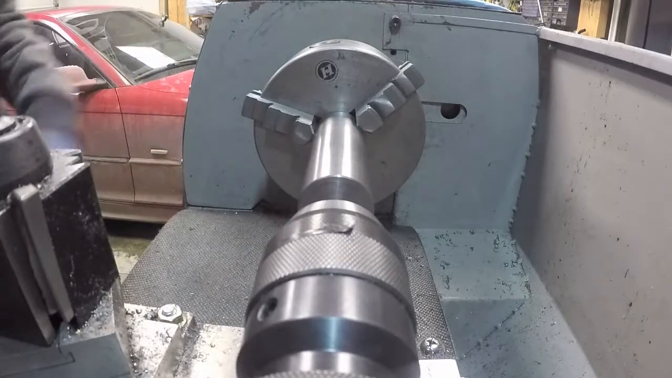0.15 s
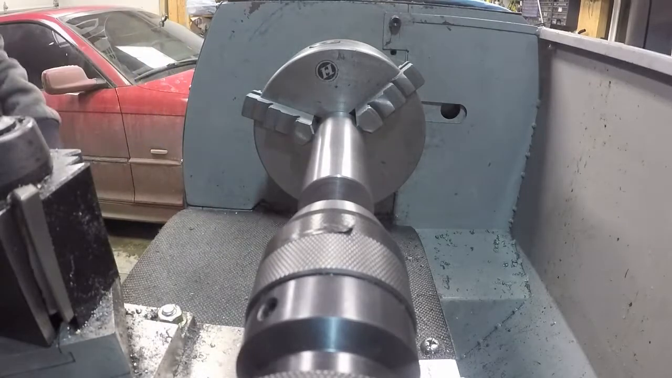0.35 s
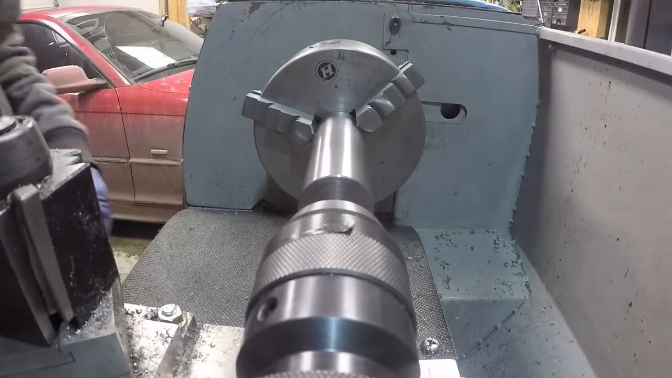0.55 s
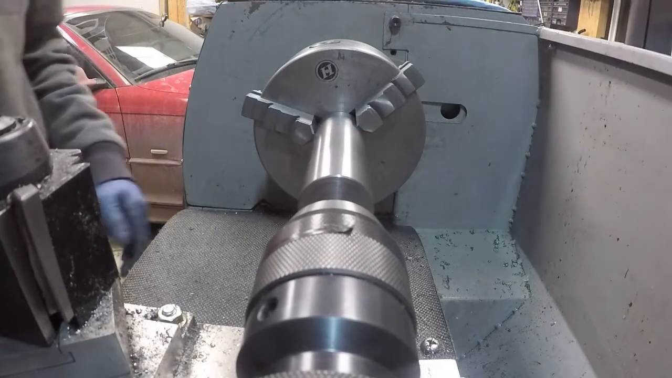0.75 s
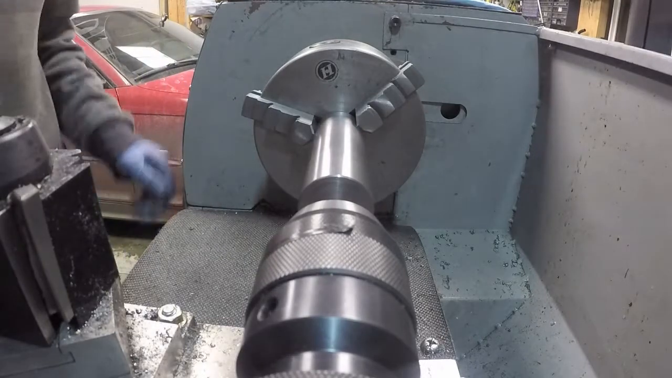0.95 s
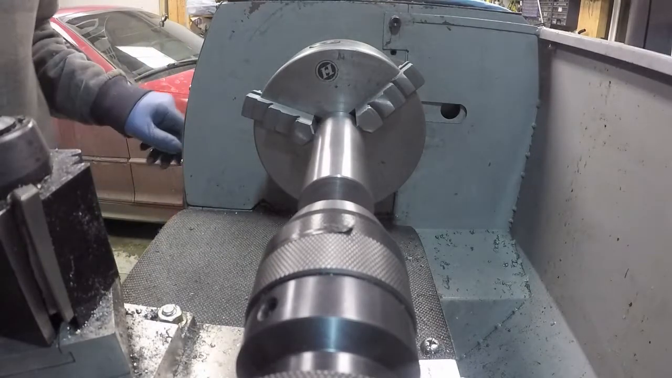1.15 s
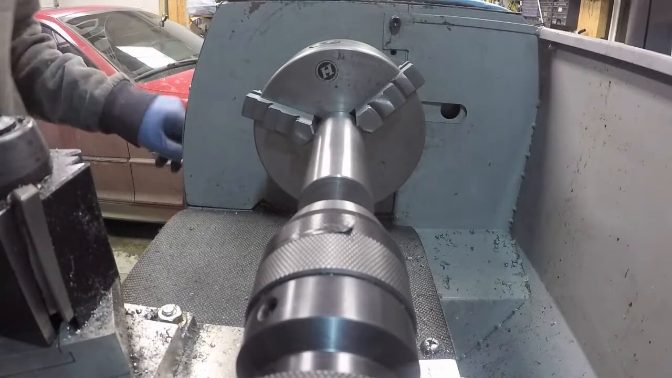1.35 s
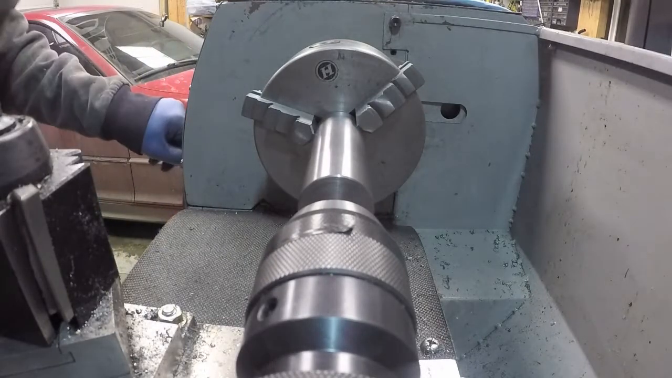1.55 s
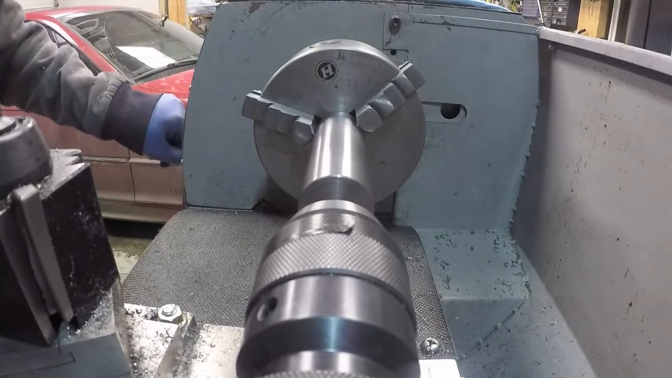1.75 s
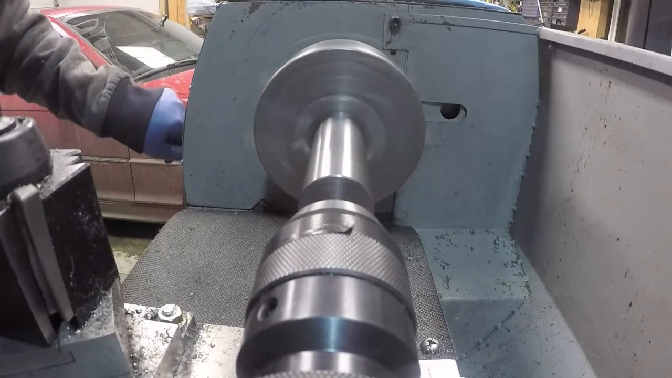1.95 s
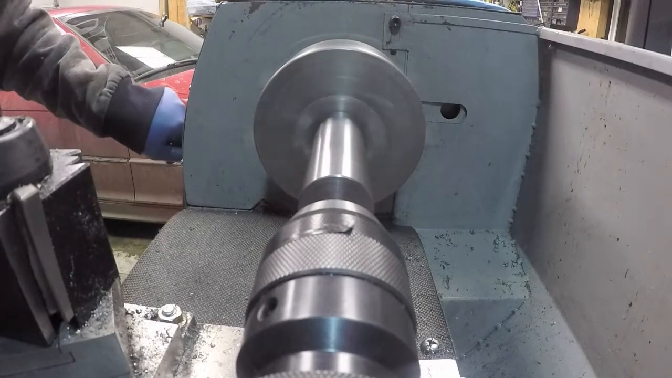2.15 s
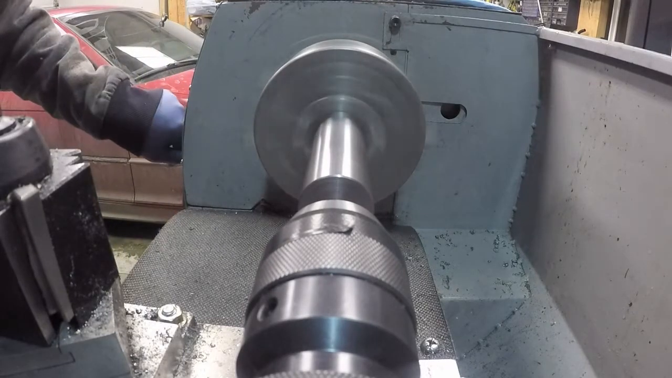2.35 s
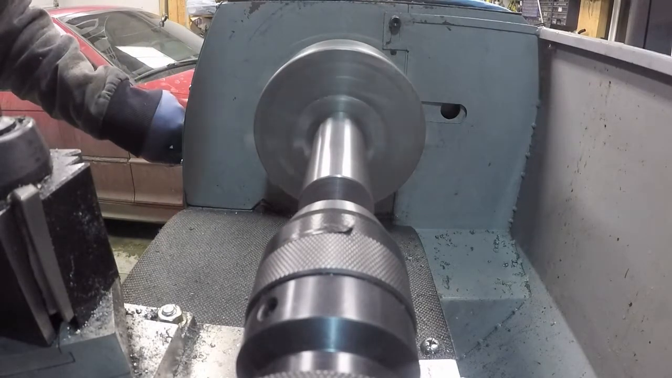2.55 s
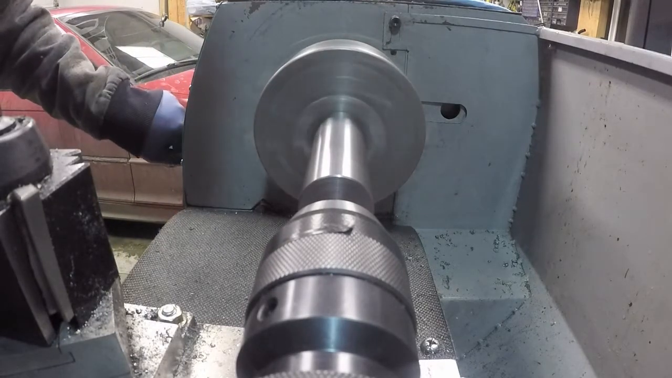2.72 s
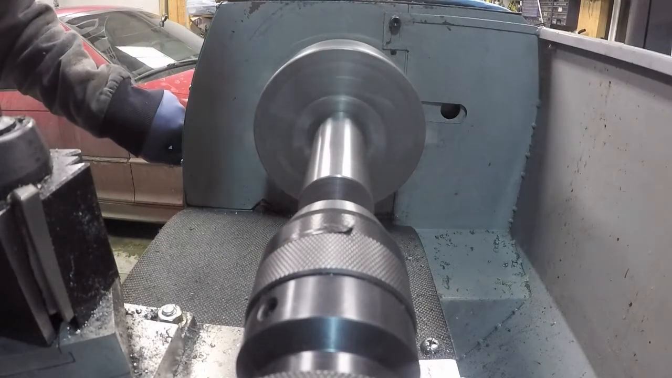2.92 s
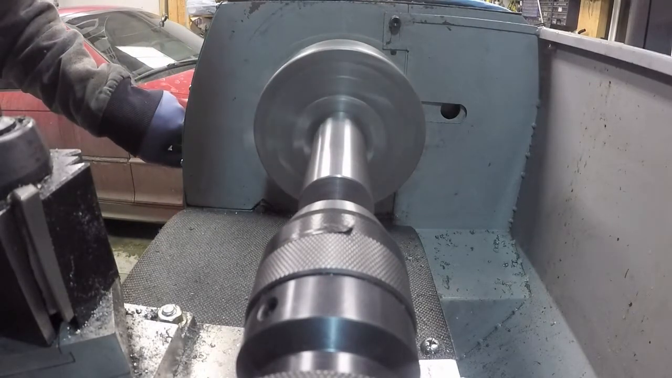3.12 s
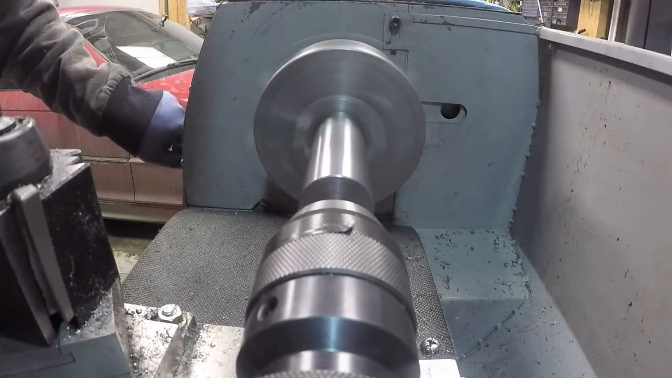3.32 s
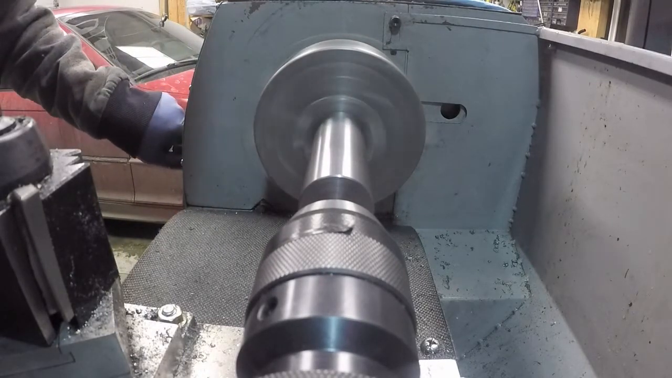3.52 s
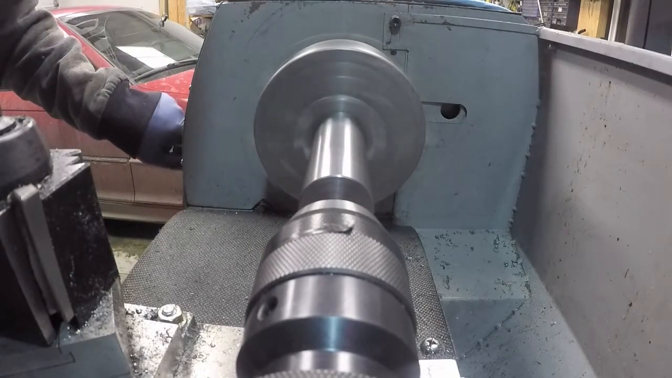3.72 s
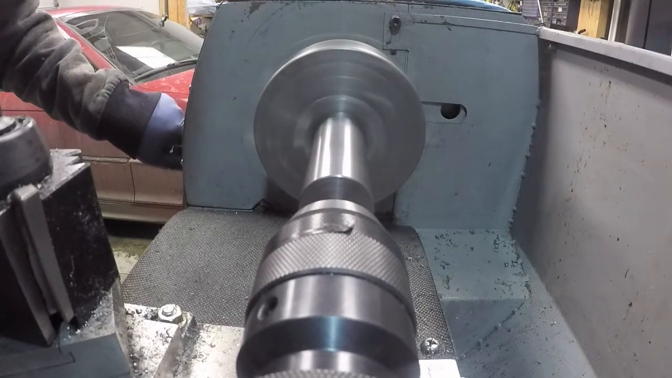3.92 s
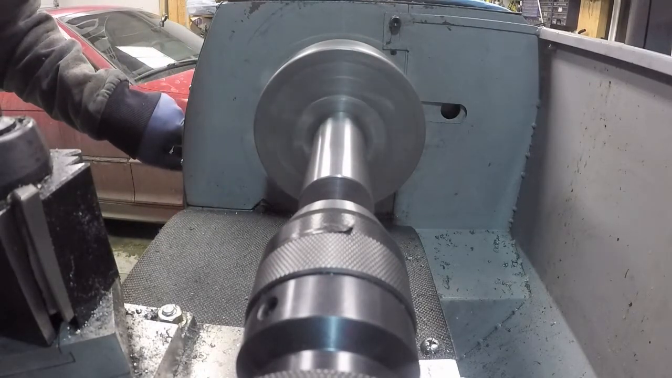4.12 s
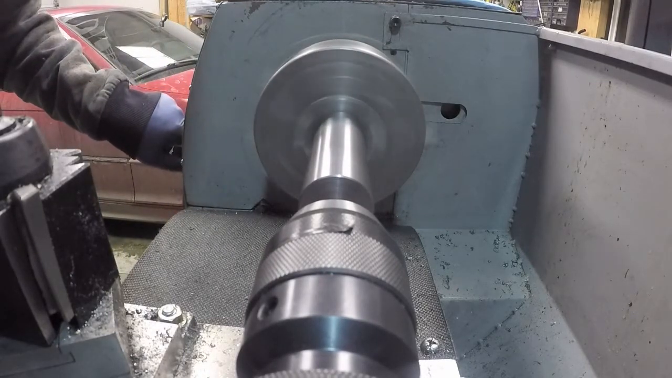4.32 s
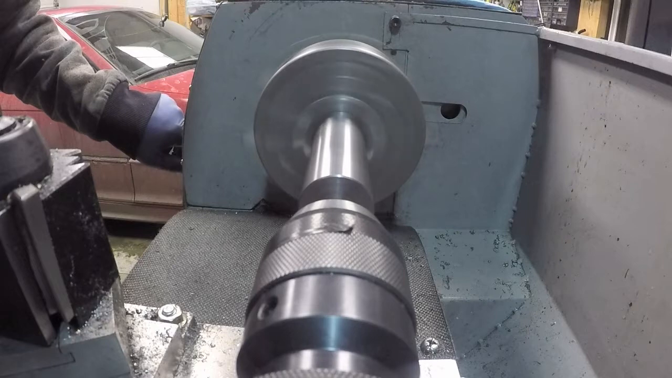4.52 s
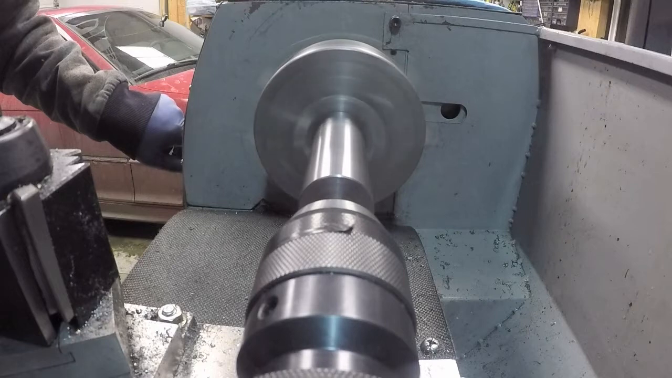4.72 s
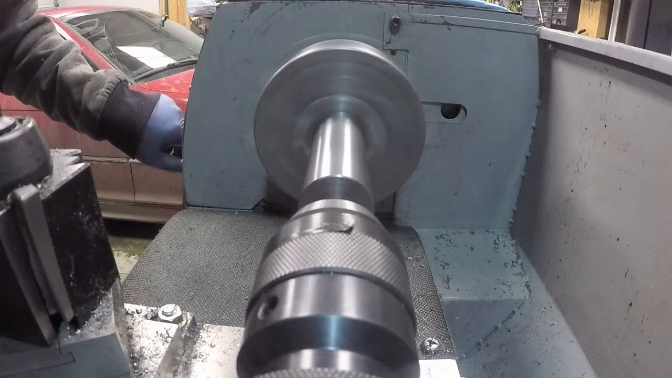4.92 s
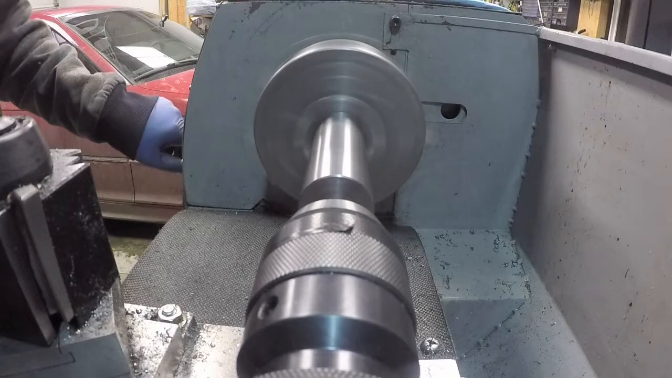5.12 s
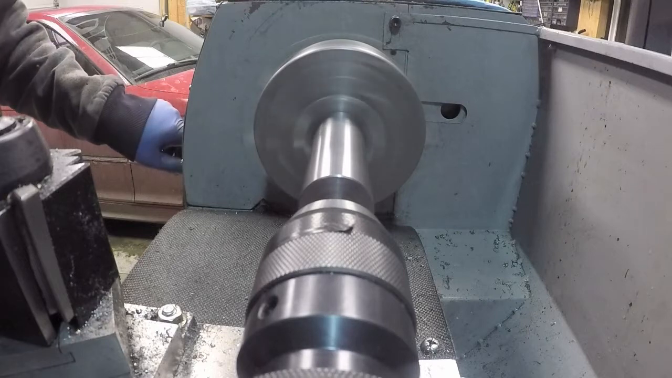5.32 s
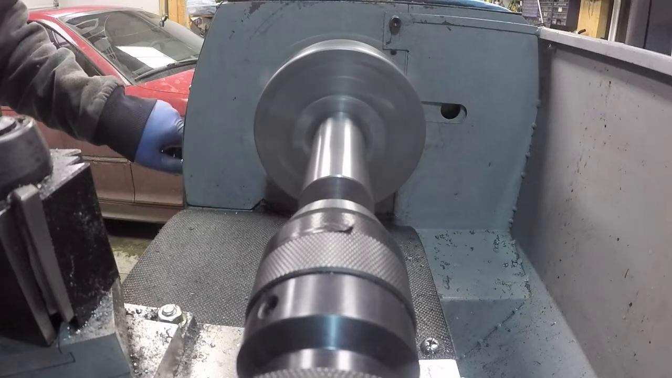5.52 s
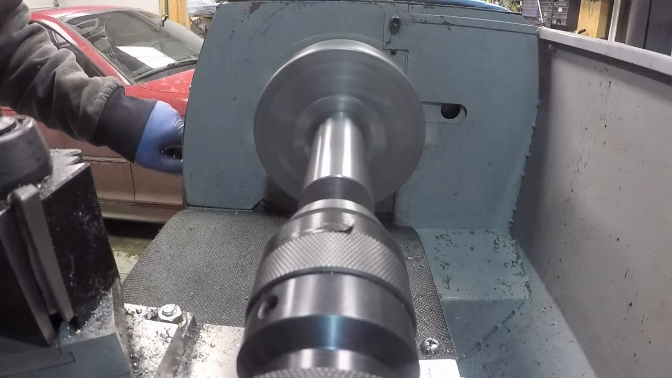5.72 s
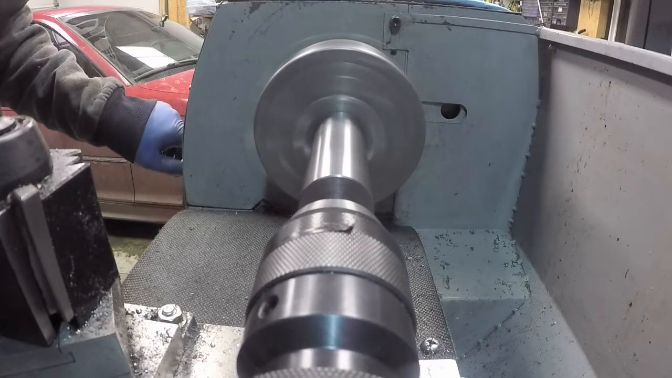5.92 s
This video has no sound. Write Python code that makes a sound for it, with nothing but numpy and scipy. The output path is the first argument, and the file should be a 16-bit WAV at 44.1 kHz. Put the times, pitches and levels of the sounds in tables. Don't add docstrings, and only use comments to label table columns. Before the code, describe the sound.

Close, machine-mounted microphone in a quiet workshop. First only dull room rumble, faint fan note, cloth friction and tiny lever ticks. Then a clustered heavy metal clunk, bouncing and clipped, starts a metal lathe. Its motor drone comes in strong, drops slightly about a second later, and continues beating over gear rattle and bearing hiss, with a few sharp snaps and hard frame knocks near the end.

```python
import sys
import numpy as np
from scipy import signal
from scipy.fft import rfft, irfft
from scipy.io import wavfile
from scipy.ndimage import uniform_filter1d

SR = 44100
rng = np.random.default_rng(int(sys.argv[2]) if len(sys.argv) > 2 else 0)


def output_pcm(signal):
    pcm = np.clip(np.atleast_2d(signal).T, -1, 1) * 32767
    wavfile.write(sys.argv[1], SR, np.round(pcm).astype(np.int16))


def voltage_ratio(decibels):
    exponent = np.asarray(decibels, float) / 20
    return 10 ** exponent


N = 267246
T = np.arange(N) / SR
HZ = np.fft.rfftfreq(N, 1 / SR)

# (frequency [Hz], density [dB per Hz])
AIR_SPECTRUM = [(12, -31.5), (25, 1), (32, -6), (50, -3.5), (75, -9), (92, -24), (180, -15.5), (361, -27.5),
                (532, -26), (665, -41.5), (3000, -49.5), (8000, -54), (12000, -61.5), (15000, -57.5)]
AIR_DB, FAN_DB, FAN_HZ = -37.5, -37.5, 56.3
STIR_DB, STIR_S = 9.5, 0.1

# (time [s], level [dB], centre [Hz], t60 [s])
CATCHES = [(.021, -32, 81, 0.31), (.161, -49, 4400, .09), (.2625, -55, 3400, .045), (.4145, -43, 2100, .07),
           (.416, -51, 1000, .07), (.457, -45, 5500, .15), (.509, -46, 2250, .082), (.63, -58, 5000, .06),
           (.816, -57, 2750, .045), (.886, -54, 3420, .045), (.945, -56, 4400, .065), (1.07, -51, 850, .12),
           (1.076, -39.5, 317, .28), (1.078, -38, 120, 0.35), (1.4715, -56, 3050, .032),
           (1.5123, -43.5, 3050, .055), (1.5135, -57, 11800, .045), (1.541, -53, 8200, .045),
           (1.621, -47, 980, .55), (1.646, -55, 10200, .045), (1.7425, -45, 5100, .07),
           (1.7445, -55, 10800, .085)]
# (time [s], level [dB], centre [Hz], t60 [s])
ENGAGING = [(1.8205, -43, 11000, 0.093), (1.8215, -34, 4770, .15), (1.822, -32.5, 1880, 0.12),
            (1.8225, -30, 800, .2), (1.826, -24, 480, 0.36), (1.851, -19, 45.8, .85),
            (1.8535, -13.5, 700, .22), (1.867, -16, 2640, 0.16), (1.873, -30, 4970, 0.085),
            (1.901, -38, 3350, 0.067), (1.951, -19.5, 156, 0.31), (1.982, -38, 10200, .13)]
# (time [s], level [dB], centre [Hz], t60 [s])
CHIPS = [(1.8205, -42, 13300, .07), (1.8235, -40, 8600, .07), (1.971, -42, 8750, .065),
         (2.206, -55, 14330, .11), (2.441, -56, 13200, .11), (2.491, -57, 13200, .085),
         (2.561, -47, 13200, 0.12), (3.601, -38, 6050, 0.091), (4.661, -56, 14100, .11),
         (5.311, -50, 13100, .085), (5.371, -55, 12100, .085), (5.437, -48, 12100, .065),
         (5.837, -27, 1950, 0.11)]
# (time [s], level [dB], centre [Hz], t60 [s])
SNAPS = [(2.6335, -17.5, 3500, 0.015), (2.958, -24, 900, .03), (5.321, -20, 900, .03),
         (5.8338, -13, 2800, .022), (5.8351, -36, 10000, .014), (5.8353, -10, 900, 0.034)]
CATCH_SHAPE = (0.74, 0.043)
ENGAGE_SHAPE = (0.79, .04)
CHIP_SHAPE = (0.24, .1)
SNAP_SHAPE = (1.46, .025)

# (loudest [s], rustle [dB], dull part re rustle [dB], rise [s], fade [s])
STROKES = [(.162, -54, -3.5, 0.065, 0.11), (.272, -62, -7, .015, .04), (.418, -47.5, -3, 0.016, .06),
           (.48, -46, -9, 0.076, .14), (.71, -67, -12, 0.046, 0.1), (.95, -60.5, -4, .18, .04),
           (1.078, -46.5, 0.5, 0.041, 0.08), (1.514, -49, -7, .004, 0.095), (1.67, -52.5, 1, 0.2, 0.15),
           (1.754, -46.5, -5, 0.068, 0.053), (1.82, -44, 3, 0.026, .1)]
STROKE_RANGE_DB = 30
# (frequency [Hz], density [dB per Hz])
CLOTH_SPECTRUM = [(1200, -10), (1400, 8.5), (2410, -8), (2730, 0), (3800, -2), (6260, -10.5), (8500, -21.5),
                  (11800, -25), (15000, -27)]

# (time [s], low ring [dB], mid ring [dB], tick [dB], ring pitch factor [ratio])
CLUTCH_BLOWS = [
    (1.8513, -7, -9, -34, .95),
    (1.8543, 1, -20, -26, 1.05),
    (1.865, -10, -1, -20.5, .85),
    (1.871, -4, 3.5, -22.5, 1.05),
    (1.882, -5.5, -19, -17.5, 0.84),
]
# (time [s], low ring [dB], mid ring [dB], tick [dB], ring
KNOCKS = [(1.9, 0, -14, -31, 0.8), (1.986, -4.5, -12, -28, 1.22), (2.6336, -18, -1, -12, 0.65),
          (2.957, -15, -4.5, -27, 0.77), (3.104, -33, -5, -29, 0.76), (4.858, -11, -11, -30, 0.74),
          (5.321, -28, -4, -26, 0.85), (5.8346, -14, 3.5, -1.5, .9), (5.957, -11, -1, -22, 0.68),
          (6.056, -11, -17, -19, 1.0)]
CLUTCH_RING_LENGTH, KNOCK_RING_LENGTH = 1, 0.59
# (frequency [Hz], level [dB], t60 [s])
LOW_MODES = [(418, -1.5, 0.086), (305, -10, 0.1)]
MID_MODES = [(950, 6, 0.02), (1114, -20.5, 0.057), (710, 0.5, 0.025)]
TICK_MODES = [(1950, -8.5, 0.057), (2450, -1, 0.0073), (3050, 1.5, 0.0078), (3660, -2.5, 0.0058),
              (4600, -8, .009), (5700, -12, .008)]

# (frequency [Hz], density [dB per Hz])
CASTING_SPECTRUM = [(12, -52), (20, -26), (111, -16), (178, -24.5), (319, -13.5), (400, -8), (511, -15),
                    (1110, -18.5), (1310, -33), (1590, -35), (2620, -30), (5850, -38), (7100, -47.5),
                    (15000, -71)]
PANEL_HZ = [42, 82, 108, 159, 209, 262, 350, 450, 545, 870, 1110, 1430, 1870]
COVER_HZ = [2270, 2585, 3065, 3504, 4080, 4655, 5104, 5711, 6105, 9200, 9330, 10400, 13500, 13720, 14190,
            15100]
# (width [Hz], level over casting [dB])
RESONANCES = [(6, 9.1), (12.96, 12.5), (10, 8), (5, 6.2), (7.95, 14.7), (8.4, 9.3), (40.3, 5.14),
              (74.4, 5.3), (23.1, 3.9), (139, 1), (55.556, 5.8), (44, 4), (185, 7.1), (80, 3.47), (90, 3.4),
              (50, 6.7), (59.7, 8.8), (50, 1.8), (45, 6.2), (25, 9.3), (120, 3), (60, 10), (90, 6),
              (60, 5.5), (900, 1.5), (2000, 8.3), (74, 3), (70, 2.5), (900, 4)]
LAYER_EDGES_HZ = [150, 1350, 6800]
# (trim [dB], share of load [ratio], jolt at start [dB], settling [s])
LAYERS = [
    (-0.14, 1.9, 3.5, .3),
    (-0.55, 0.8, -0.5, .1),
    (-0.66, .25, -6.5, 0.078),
    (0.1, .45, -4, .1),
]
# (time [s], load [dB])
LOAD = [(1.9, 0.5), (2.3, -3.5), (2.8, -0.3), (3.3, -1.4), (3.75, -1.5), (4.3, -0.2), (4.6, 0.8), (5.0, 2),
        (5.6, 1), (6.06, 2)]
RATTLE_DB, START_S, LUMPY_DB, LUMPS_HZ = -16, 1.88, 2, 3.1

SHAFT_HZ, HUM_HZ, SLOT_HZ = 29.752, 120.03, 1132.5
SHAFT_ORDERS = [1, 2, 6, 8, 10, 11, 13, 14, 18, 20]
SHAFT_DB = [-41, -35, -43.5, -54, -34, -28.5, -31, -47, -37.5, -41.5]
HUM_ORDERS = [1, 2, 5, 6]
HUM_DB = [-29, -32.5, -36, -41.5]
DRONE_SIDEBANDS = [1, 2, 3]
DRONE_SIDE_DB = [-32.5, -33.5, -39]
SLOT_SIDEBANDS = [-3, -1, 0, 1, 2, 3]
SLOT_DB = [-61, -38.5, -40, -46.5, -52, -51]

DRONE_DB, DRONE_START_S, BEAT_PEAK_S, SETTLE_S = -18.5, 2.01, 3.0, 3.17
STARTING_DB, STARTING_DEPTH, RUNNING_DEPTH = 5.5, 0.21, 0.18
# (time [s], level change [dB], half length [s])
SURGES = [(2.303, -5.5, 0.035), (2.426, 2, .06), (2.57, -4.5, .03), (2.663, 3.5, 0.031),
          (2.87, -7.5, 0.048), (2.997, 3, 0.07), (3.187, -8, 0.021), (4.01, 3.5, .05), (5.223, 9, .04),
          (5.287, -5, 0.018), (5.665, 3.5, 0.034)]

SQUEAL_HZ, SQUEAL_DB, BEAD_DB = 9202, -64, 7.0
WHINE_HZ, WHINE_DB, WHINE_SHARE = 12407.6, -65, .47
FRAME_HZ, WHINE_MIDDLE_S, MIC_EDGE_HZ = 29.97, .0044, 15290


def evened(x):
    return x / np.sqrt(np.mean(x ** 2) + 1e-20)


def read(points):
    f, value = np.transpose(points)
    return np.interp(np.log(HZ + 1), np.log(f + 1), value)


def curves(rows):
    s, *columns = np.transpose(rows)
    return [np.interp(T, s, c) for c in columns]


def drift(top_hz):
    steps = N // 128 + 2
    bin_hz = np.arange(steps // 2 + 1) / T[-1]
    slow = irfft(rfft(rng.standard_normal(steps)) * np.exp(-(bin_hz / top_hz) ** 2), steps)
    return np.interp(T, np.linspace(0, T[-1], steps), evened(slow))


def above(edge_hz):
    return 1 / (1 + (edge_hz / (HZ + 1)) ** 12)


def grit(per_s, spread_db, share):
    hits = rng.random(N) < per_s / SR
    sizes = voltage_ratio(spread_db * np.minimum(rng.exponential(1, N), 4))
    clicks = hits * sizes * rng.choice([-1, 1], N)
    share = np.clip(share, 0, 1)
    return np.sqrt(1 - share) * rng.standard_normal(N) + np.sqrt(share) * evened(clicks)


def patchy(x, patchy_db):
    z = signal.stft(x, nperseg=1024)[2]
    field = uniform_filter1d(rng.standard_normal(z.shape), size=4, axis=0)
    field = uniform_filter1d(field, size=7, axis=1)
    return signal.istft(z * voltage_ratio(patchy_db * evened(field)), nperseg=1024)[1][:N]


def add(mix, s, sound):
    part = mix[round(s * SR):][:len(sound)]
    part += sound[:len(part)]


def power_on(start_s, rise_s):
    return np.sin(np.pi / 2 * np.clip((T - start_s) / rise_s, 0, 1)) ** 2


def tone(hz, db, waver_db=1.5, waver_rad=0.43):
    phase = 2 * np.pi * (hz * T + rng.random()) + waver_rad * drift(2.9)
    return np.sqrt(2) * voltage_ratio(db + waver_db * drift(4.3)) * np.sin(phase)


def workshop():
    air = evened(irfft(rfft(rng.standard_normal(N)) * voltage_ratio(read(AIR_SPECTRUM)), N))
    stirred = irfft(rfft(air) * (above(110) - above(620)), N)
    swell = voltage_ratio(STIR_DB * np.exp(-T / STIR_S) - 0.7)
    fan = tone(FAN_HZ, FAN_DB, waver_db=0.5, waver_rad=0.2)
    return voltage_ratio(AIR_DB) * (air + stirred * (swell - 1)) + fan


def scrapes():
    out, t = np.zeros(N), np.arange(SR // 4) / SR
    hz = np.fft.rfftfreq(len(t), 1 / SR)
    kinds = (CATCHES, CATCH_SHAPE), (ENGAGING, ENGAGE_SHAPE), (CHIPS, CHIP_SHAPE), (SNAPS, SNAP_SHAPE)
    for table, (wide, quick) in kinds:
        for s, db, centre_hz, t60 in table:
            width_hz, rise_s = wide * centre_hz, quick * t60
            resonance = 1 / (1 + (2 * (hz - centre_hz) / width_hz) ** 4)
            puff = evened(irfft(rfft(rng.standard_normal(len(t))) * resonance, len(t)))
            decay = voltage_ratio(db - 60 * np.maximum(t - rise_s, 0) / t60)
            add(out, s, puff * np.minimum(t / rise_s, 1) * decay)
    return out


def rustle():
    drive = rfft(patchy(grit(900, 2.5, 0.21) * voltage_ratio(2.0 * drift(56)), patchy_db=3.0))
    bright = evened(irfft(drive * voltage_ratio(read(CLOTH_SPECTRUM)) * above(1760), N))
    dull = evened(irfft(drive * (above(570) - above(1210)), N))
    out = np.zeros(N)
    for s, db, dull_db, rise, fade in STROKES:
        distance = np.maximum((s - T) / rise, (T - s) / fade)
        out += voltage_ratio(db - STROKE_RANGE_DB / 2 * distance) * (bright + voltage_ratio(dull_db) * dull)
    return out * (1 - power_on(1.815, .02))


def blows():
    out, t = np.zeros(N), np.arange(SR // 4) / SR
    rings = ((LOW_MODES, .002, .003), (MID_MODES, .0012, .001), (TICK_MODES, 0, .0004))  # (modes, delay s, rise s)
    rows = [(*row, CLUTCH_RING_LENGTH) for row in CLUTCH_BLOWS]
    rows += [(*row, KNOCK_RING_LENGTH) for row in KNOCKS]
    for s, *levels, pitch, length in rows:
        for level_db, (modes, delay, rise), k in zip(levels, rings, (pitch, pitch, 1)):
            ring = sum(voltage_ratio(db - 60 * t / (t60 * length)) * np.sin(2 * np.pi * f * k * t) for f, db, t60 in modes)
            add(out, s + delay, voltage_ratio(level_db) * ring * (1 - np.exp(-(t / rise) ** 2)))
    return out


def rattle():
    throb = 1 + 0.045 * np.sin(2 * np.pi * SHAFT_HZ * T + 0.55 * drift(1.8))
    drive = rfft(patchy(grit(1500, 3.8, 0.2) * throb * voltage_ratio(0.34 * drift(30)), patchy_db=1.48))
    colour_db = read(CASTING_SPECTRUM)
    for f, (width_hz, db) in zip(PANEL_HZ + COVER_HZ, RESONANCES):
        colour_db = colour_db + db / (1 + (2 * (HZ - f) / width_hz) ** 2)
    steps = [1 + 0 * HZ] + [above(f) for f in LAYER_EDGES_HZ] + [0 * HZ]
    parts = [irfft(drive * voltage_ratio(colour_db) * (lo - hi), N) for lo, hi in zip(steps, steps[1:])]
    load_db, since = curves(LOAD)[0], np.maximum(T - START_S, 0)
    swells = [voltage_ratio(trim_db + share * load_db + jolt_db * np.exp(-(since / settle_s) ** 2))
              for trim_db, share, jolt_db, settle_s in LAYERS]
    swells[0] = swells[0] * voltage_ratio(LUMPY_DB * drift(LUMPS_HZ))
    scale = np.sqrt(np.mean(sum(parts) ** 2))
    running = sum(p * s for p, s in zip(parts, swells))
    return voltage_ratio(RATTLE_DB) / scale * running * power_on(1.85, 0.019)


def motor():
    lines = [(k * SHAFT_HZ, db) for k, db in zip(SHAFT_ORDERS, SHAFT_DB)]
    lines += [(k * HUM_HZ, db) for k, db in zip(HUM_ORDERS, HUM_DB)]
    lines += [(12 * SHAFT_HZ + k * HUM_HZ, db) for k, db in zip(DRONE_SIDEBANDS, DRONE_SIDE_DB)]
    lines += [(SLOT_HZ + k * HUM_HZ, db) for k, db in zip(SLOT_SIDEBANDS, SLOT_DB)]
    return sum(tone(*line) for line in lines) * power_on(1.9, 0.044)


def squeal():
    phase = 2 * np.pi * np.cumsum(SQUEAL_HZ + 40 * drift(40)) / SR
    level_db = SQUEAL_DB + BEAD_DB * np.minimum(drift(16), 1.3)
    return voltage_ratio(level_db) * np.sin(phase) * power_on(2.0, .05)


def drone():
    starting = 1 - power_on(SETTLE_S, 0.066)
    depth = RUNNING_DEPTH + (STARTING_DEPTH - RUNNING_DEPTH) * starting
    drone_hz, partner_hz = 12 * SHAFT_HZ, 3 * HUM_HZ
    beat = abs(1 + depth * np.exp(2j * np.pi * (partner_hz - drone_hz) * (T - BEAT_PEAK_S)))
    surge_db = sum(db * np.exp(-((T - s) / half) ** 2) for s, db, half in SURGES)
    line = tone(drone_hz, DRONE_DB + STARTING_DB * starting + surge_db, waver_db=1.2, waver_rad=0.24)
    flutter = voltage_ratio(1.5 * (1 - 0.84 * starting) * drift(25))
    return line * beat * flutter * power_on(DRONE_START_S, 0.077)


def scene():
    hand = scrapes() + rustle()
    machine = blows() + rattle() + motor() + squeal() + drone()
    return (workshop() + hand + machine)[None]


def top_cut(x):
    return signal.sosfilt(signal.butter(12, 15780, fs=SR, output="sos"), x)


def record(dry):
    gate = abs((FRAME_HZ * (T - WHINE_MIDDLE_S) + .5) % 1 - .5) < WHINE_SHARE / 2
    gate = uniform_filter1d(1. * gate, size=40)
    whine = np.sqrt(2) * voltage_ratio(WHINE_DB) * gate * np.sin(2 * np.pi * WHINE_HZ * T)
    limited = signal.oaconvolve(dry + whine, signal.firwin(801, MIC_EDGE_HZ, fs=SR)[None], "same")
    return top_cut(np.clip(limited, -1, 1))


dry = scene()
out = record(dry)
output_pcm(out)
```